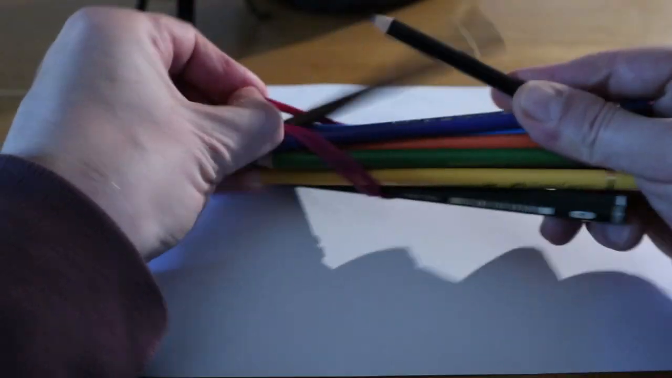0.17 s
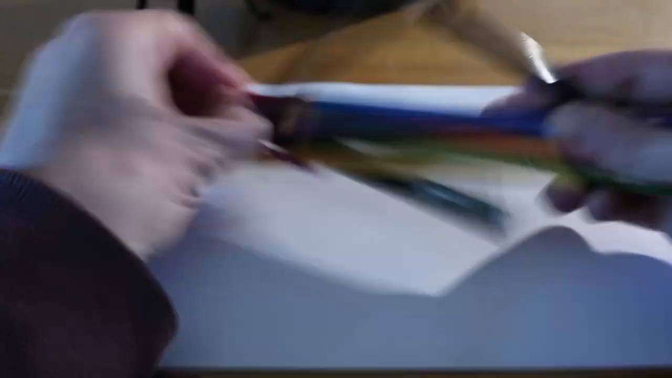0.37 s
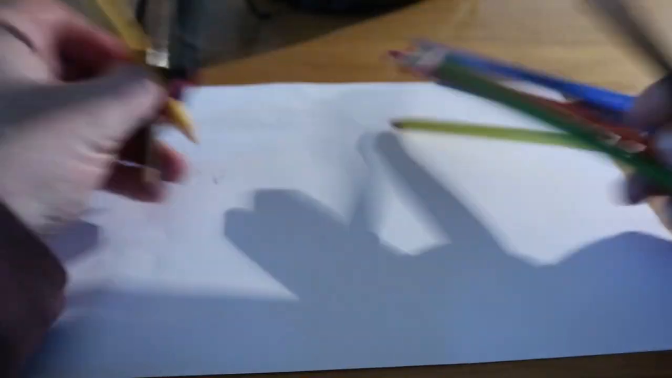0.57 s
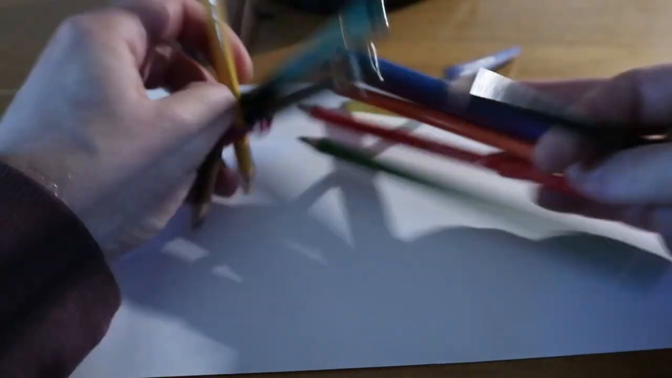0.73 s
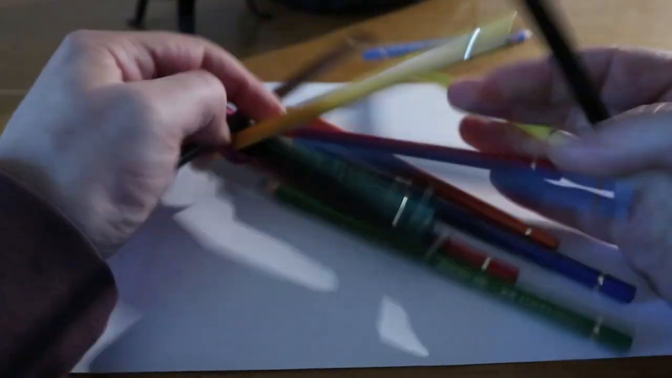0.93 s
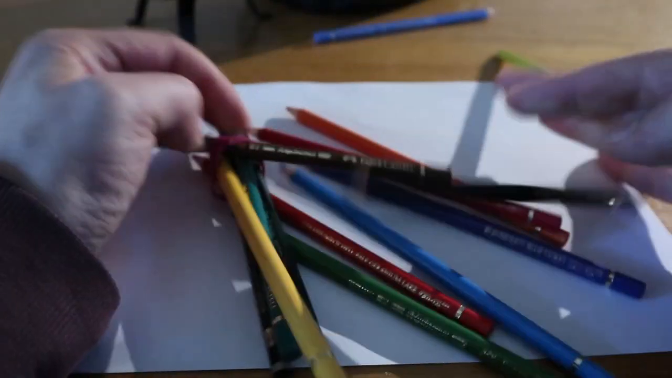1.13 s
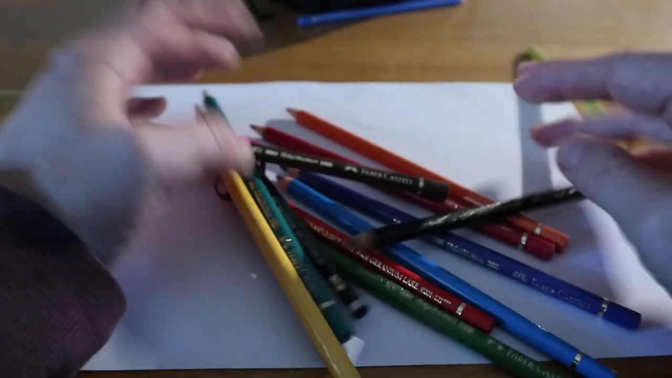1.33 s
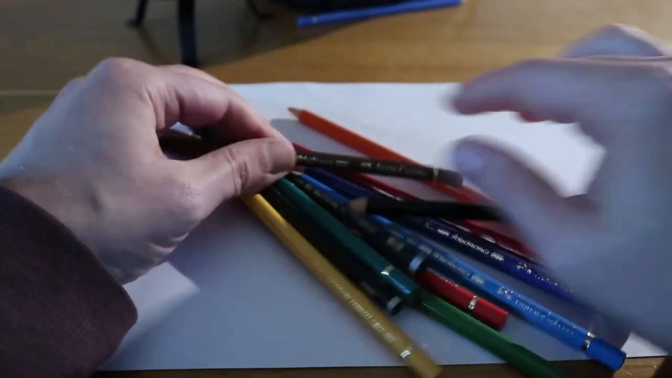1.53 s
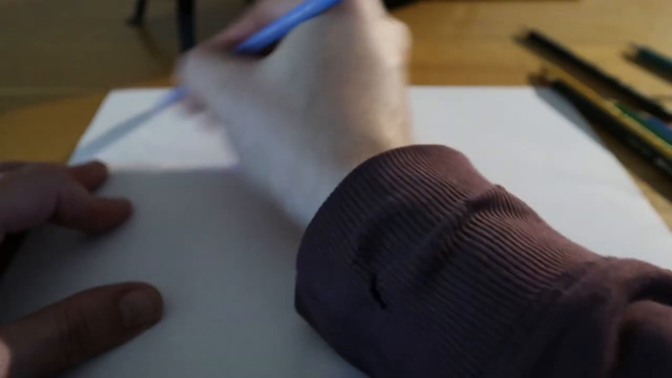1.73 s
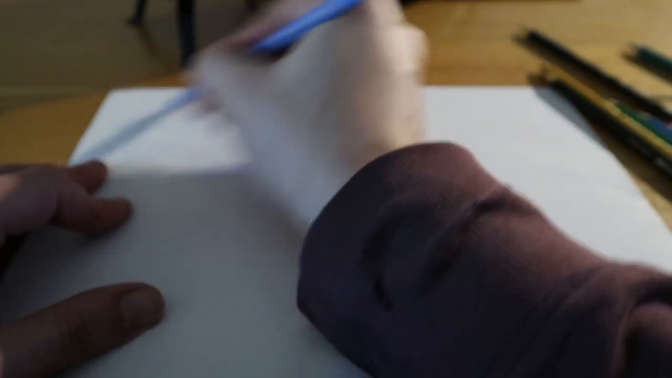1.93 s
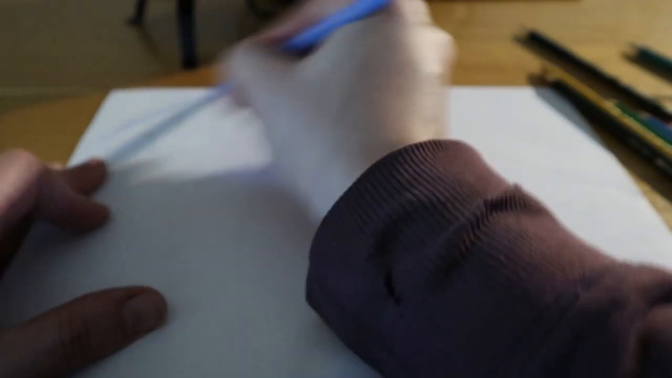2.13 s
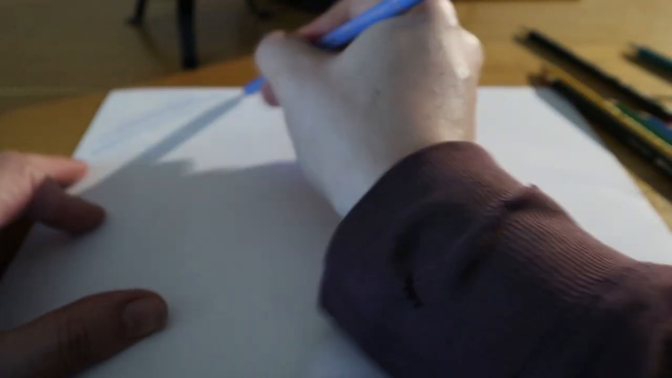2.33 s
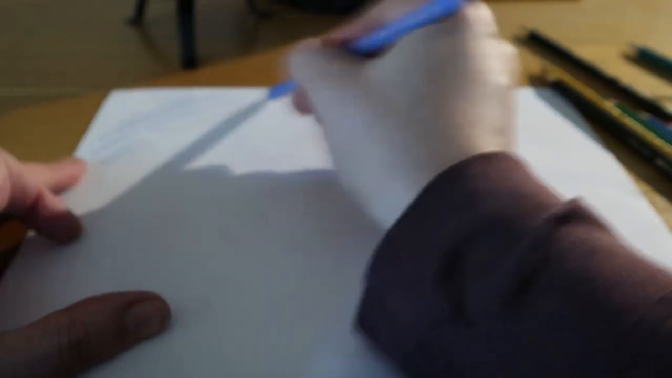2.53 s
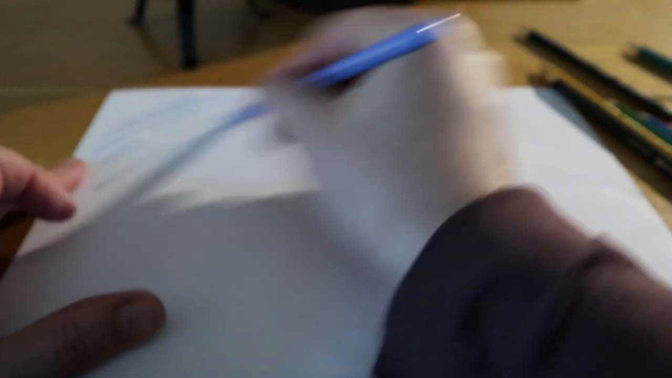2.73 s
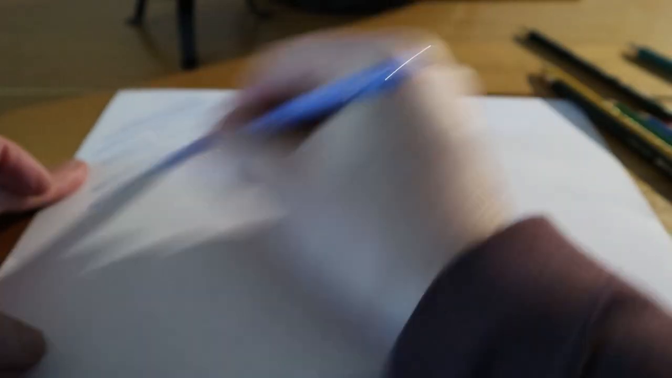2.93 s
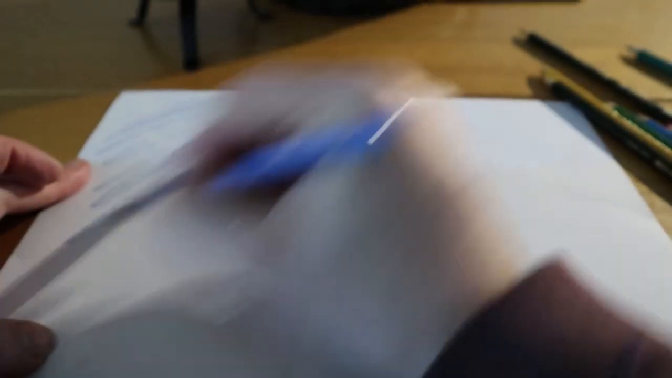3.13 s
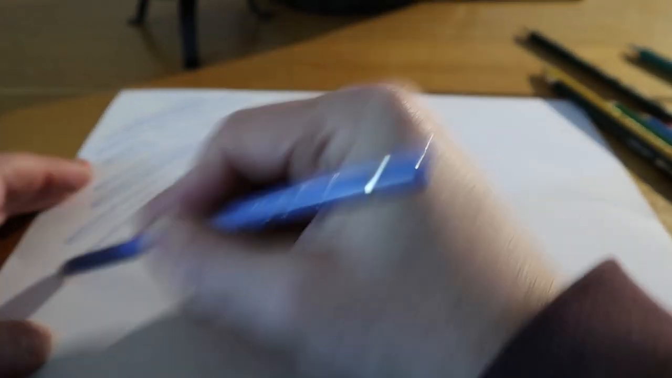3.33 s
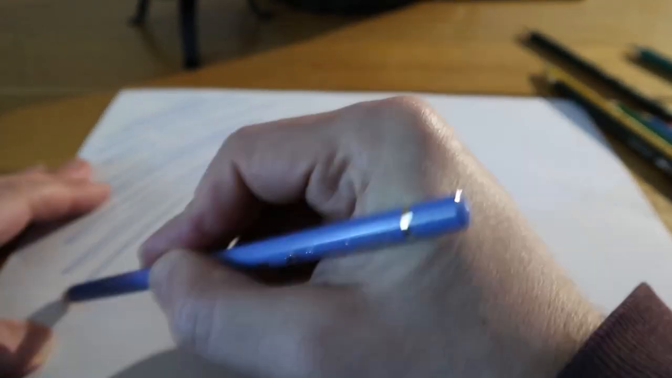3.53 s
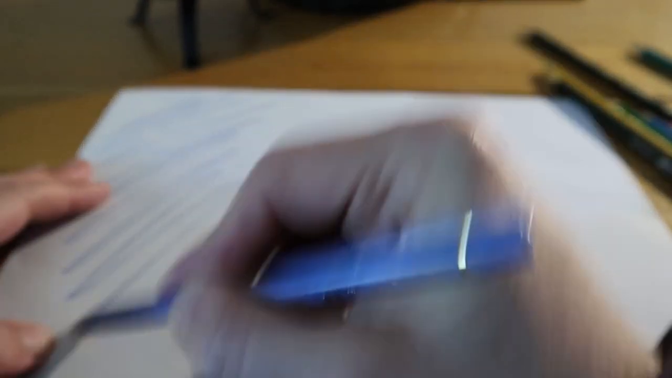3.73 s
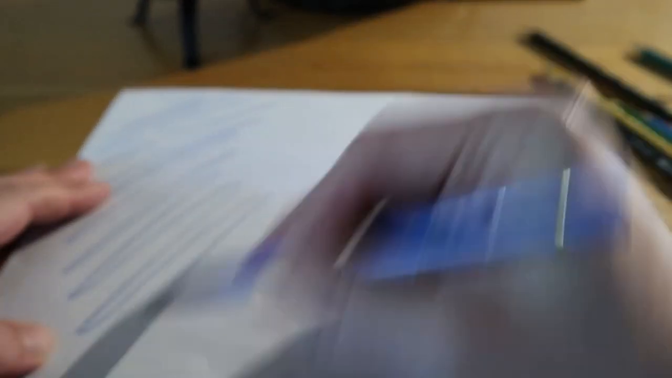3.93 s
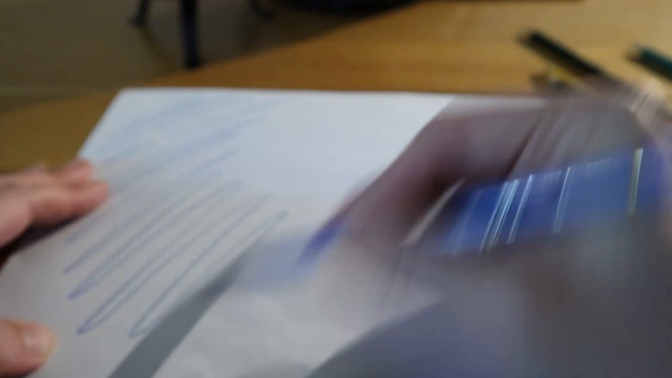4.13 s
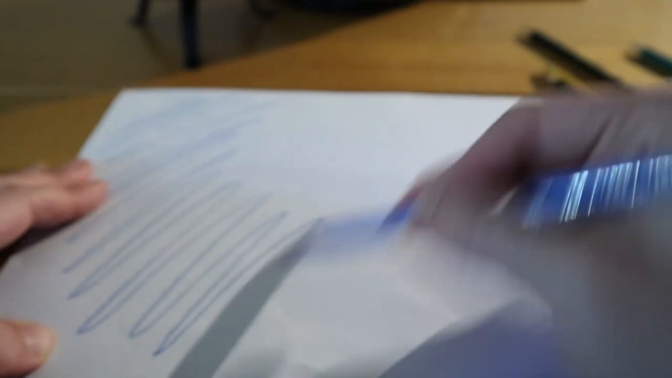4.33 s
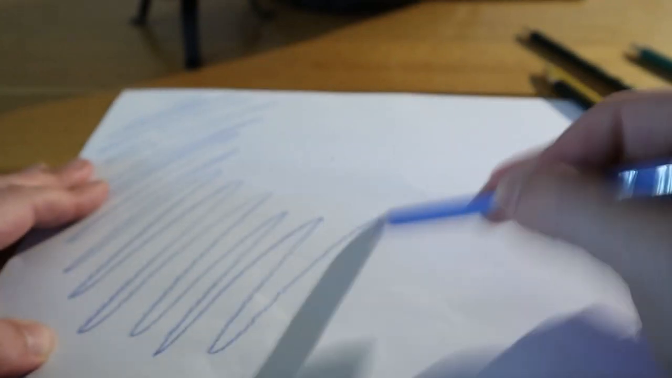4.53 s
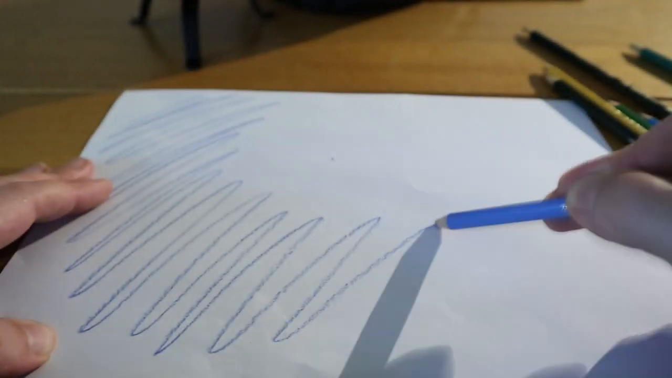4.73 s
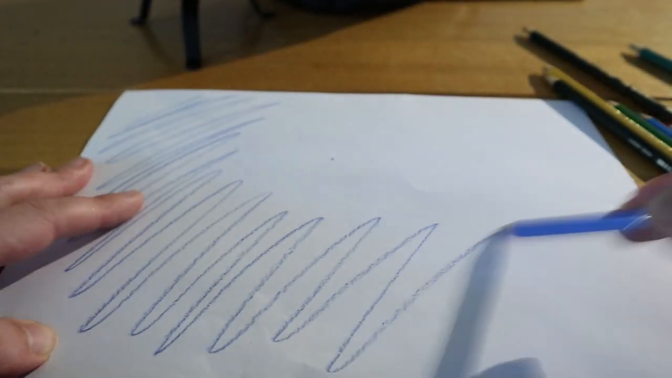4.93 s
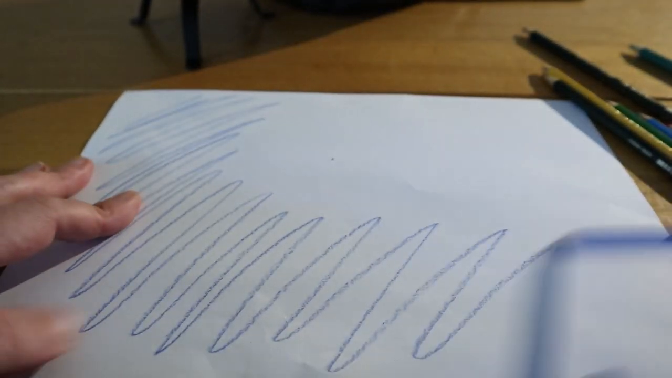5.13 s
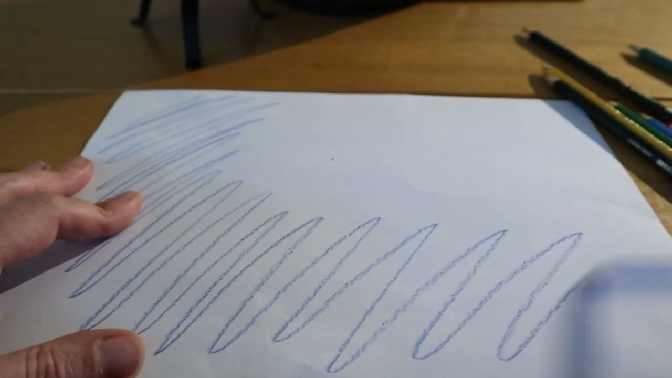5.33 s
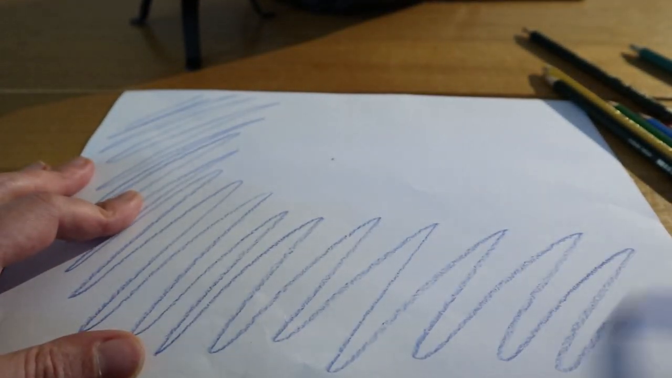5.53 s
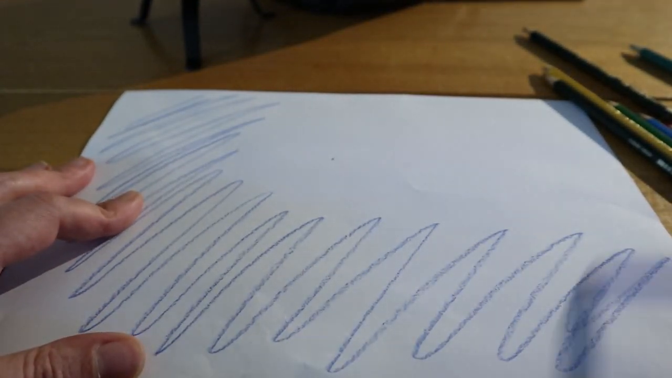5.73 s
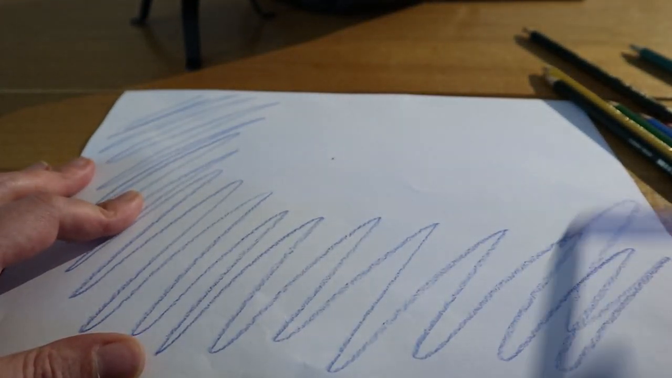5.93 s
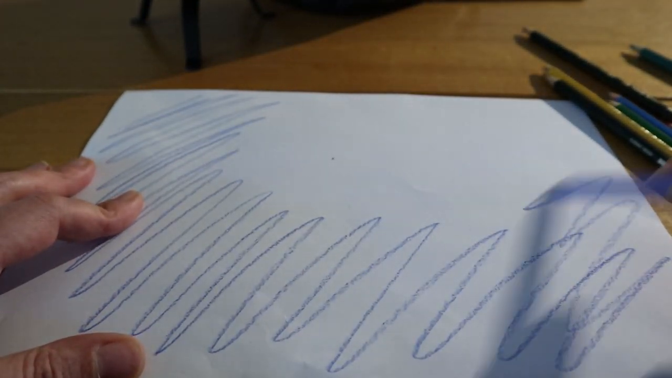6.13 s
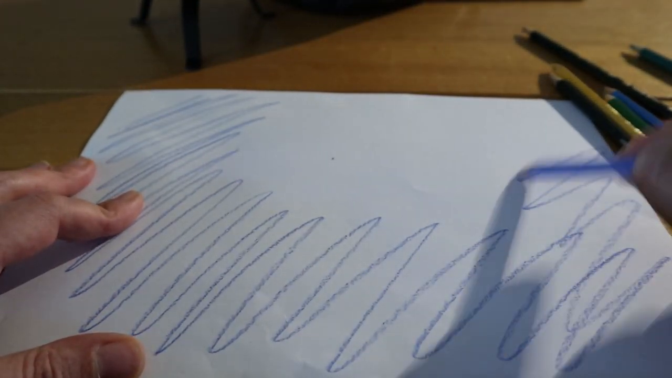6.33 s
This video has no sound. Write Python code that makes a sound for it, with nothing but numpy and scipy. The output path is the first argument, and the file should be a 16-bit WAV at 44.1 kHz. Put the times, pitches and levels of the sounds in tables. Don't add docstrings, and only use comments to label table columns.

```python
import sys
import numpy as np
from scipy import signal
from scipy.fft import rfft, irfft, next_fast_len
from scipy.io import wavfile
from scipy.ndimage import map_coordinates

SR = 44100
rng = np.random.default_rng(int(sys.argv[2]) if len(sys.argv) > 2 else 0)


def wrap_up_sound(samples):
    columns = np.atleast_2d(samples).T
    tamed = np.clip(columns, -1, 1)
    steps = np.round(tamed * 32767).astype(np.int16)
    wavfile.write(sys.argv[1], SR, steps)


def volts_from_db(level):
    exponent = np.asarray(level, float) / 20
    return 10 ** exponent


N = 286209
T = np.arange(N) / SR
SCENE_CHANGE_S = 1.606
PUT_DOWN_S, REACHED_S = 1.62, 5.98
TIP_HZ = 8000


def unit(x):
    return x / np.sqrt(np.mean(np.abs(x) ** 2) + 1e-20)


def along(points, hz):
    f, value = np.transpose(points)
    return np.interp(np.log(hz + 1), np.log(f + 1), value)


def filtered(x, response):
    m = next_fast_len(N + SR // 4)
    return irfft(rfft(x, m) * response(np.fft.rfftfreq(m, 1 / SR)), m)[..., :N]


def modes(table):
    def response(f):
        total = 0
        for k, (hz, width, db) in enumerate(table):
            total = total + (-1) ** k * volts_from_db(db) * 1j * f * width / (hz * hz - f * f + 1j * f * width)
        return total
    return response


def resonate(x, hz, width, times=1):
    for _ in range(times):
        x = signal.lfilter(*signal.iirpeak(hz, hz / width, SR), x)
    return x


def decay(t, t60):
    return volts_from_db(-60 * t / t60)


def onset(t, rise_s):
    return 1 - np.exp(-t / rise_s)


def sine(hz, t):
    return np.sin(2 * np.pi * hz * t)


def add_at(out, s, sound):
    out[..., round(s * SR):][..., :sound.shape[-1]] += sound


def wobble(rate):
    return map_coordinates(rng.standard_normal(int(N * rate / SR) + 4), [T * rate])


def grains(rate, spread_db):
    hit = rng.random(N) < rate / SR
    return unit(hit * rng.standard_normal(N) * volts_from_db(spread_db * rng.exponential(size=N)))


def placed(x, lag):
    hz, t, z = signal.stft(x, SR, nperseg=256)
    turn = np.exp(-1j * np.pi * hz[:, None] / SR * np.interp(t, T, lag))
    return signal.istft(np.array([z * turn, z / turn]), SR, nperseg=256)[1][:, :N]


# turning point t/s, hiss level/dB, barrel ring over hiss level/dB
PUSH_STROKES = [(1.635, -44.5, 2), (1.88, -41, -2.5), (2.077, -38, 0), (2.292, -37.5, 1), (2.515, -35, 3),
                (2.732, -37, -2.5), (2.959, -35.5, -5), (3.167, -31, -1.5), (3.409, -30, -15),
                (3.613, -34, -14), (3.833, -33.5, -5.5), (4.056, -34, -11.5), (4.272, -34, -5.5),
                (4.484, -34, -8), (4.698, -34, -9.5), (4.919, -31.5, -4.5), (5.131, -33, -6),
                (5.354, -33.5, -9.5), (5.566, -35, -6.5), (5.773, -35.5, -4.5), (5.983, -36.5, -6),
                (6.179, -33.5, -9), (6.394, -32, -12)]
# turning point t/s, hiss level/dB, barrel ring over hiss level/dB
PULL_STROKES = [(1.769, -43.5, 4), (1.978, -42, 6), (2.186, -38.5, -0.5), (2.407, -42, 4.5),
                (2.623, -38, -2.5), (2.846, -38, 2), (3.066, -40.5, 5), (3.286, -39, 3.5),
                (3.503, -37.5, 0.5), (3.73, -35, 3), (3.949, -37.5, -5), (4.166, -37.5, -0.5),
                (4.382, -36.5, -2.5), (4.597, -38.5, 1), (4.814, -37, 2), (5.033, -37, -5.5),
                (5.248, -36.5, -5), (5.463, -35.5, -3), (5.679, -37, -4.5), (5.897, -38.5, -4),
                (6.084, -36.5, -6.5), (6.292, -34, -13)]


def stroke_motion():
    # moment of top speed (0-1), barrel f/Hz, hiss left at the turn level/dB
    push, pull = (0.47, 1777, -37), (0.4, 1725, -54)
    strokes = sorted([(*row, *push) for row in PUSH_STROKES] + [(*row, *pull) for row in PULL_STROKES])
    start, hiss_db, ring_db, top, pitch_hz, turn_db = np.transpose(strokes)
    pitch_hz = pitch_hz + 35 * rng.standard_normal(len(start))
    turn_db = turn_db + 26.68 * (np.abs(start - 3.164) < .02)
    end = np.append(start[1:], N / SR)
    middle = start + top * (end - start)
    knots = np.ravel(np.transpose([start, middle]))
    cycle = np.interp(T, np.append(knots, end[-1]), np.arange(len(knots) + 1) / 2)
    speed = np.abs(np.sin(np.pi * cycle))
    rest = volts_from_db(np.interp(T, start, turn_db))
    swell_db = 20 * np.log10(rest + (1 - rest) * speed + 1e-4)
    hiss_db, ring_db, pitch_hz = [np.interp(T, middle, v) for v in (hiss_db, ring_db, pitch_hz)]
    return T > start[0], cycle, swell_db, hiss_db, ring_db, pitch_hz


# t/s, peak level/dB, sharp crack level/dB
PAPER_SNAGS = [(2.019, -31, -19), (2.124, -18, -31), (2.2023, -19, -22), (2.538, -14, -21),
               (2.563, -25, -28), (2.775, -16, -18.5), (3.3156, -13.5, -23), (3.337, -29, -5.5),
               (3.472, -16.5, -21), (3.687, -15.5, -14.5), (3.699, -11, -27), (3.7549, -16.5, -24),
               (3.8788, -18.5, -7), (4.5173, -14.5, -27), (4.736, -18, -29), (4.957, -1.5, -17),
               (5.714, -15.5, -27)]


def snags():
    to_barrel, to_lead = np.zeros(N), np.zeros(N)
    for s, db, crack_db in PAPER_SNAGS:
        to_barrel[round(s * SR)] = volts_from_db(db - 8.5)
        to_lead[round(s * SR)] = volts_from_db(db + crack_db + 25.5)
    return to_barrel, to_lead


# f/Hz, width/Hz, level/dB
LEAD_MODES = [(3175, 570, -1.5), (4550, 130, -5), (5013, 405, 5), (6600, 110, -12), (7500, 1330, -3),
              (9660, 2480, 3), (1390, 220, -5), (5340, 266, -3)]
FLAT_GAIN = [8, 16.5, 6, 12, 4, 1, 3.5, -8]
PULL_GAIN = [1.5, -7, -2, 2, 0, 1.5, 3, 9.5]


def lead_hiss(level, cycle, flat, snag):
    far_gain = [0, 0, 1.5, 0, 1, 0, -0.5, 1]  # dB, once the hand has moved off to the right
    far = np.interp(T, [4.9, 5.16], [0, 1])
    pulling = np.floor(cycle) % 2 * np.minimum(2.5 * (cycle % 1), 1)
    scrape = unit(grains(14000, spread_db=1.5))
    total = np.zeros(N)
    for (hz, width, db), flat_db, pull_db, far_db in zip(LEAD_MODES, FLAT_GAIN, PULL_GAIN, far_gain):
        gain_db = db + flat * flat_db + pulling * pull_db + far * far_db + 3 * wobble(14)
        total += volts_from_db(gain_db) * resonate(scrape, hz, 1.77 * width, times=2)
    return level * unit(total) + volts_from_db(8) * resonate(filtered(snag, modes(LEAD_MODES)), 4050, 2000)


# offset f/Hz, width/Hz, level/dB
BENDING_MODES = [(-30, 74, -1), (79, 70, -1.5), (-200, 200, -8)]


def barrel_ring(ring_level, pitch_hz, snag):
    phase = np.exp(2j * np.pi * np.cumsum(pitch_hz + 35 * wobble(30)) / SR)

    def ring(push, width_hz, offset_hz=0):
        pole = np.exp(np.pi * (2j * offset_hz - width_hz) / SR)
        return np.imag(phase * signal.lfilter([1], [1, -pole], push / phase))

    rub = grains(2500, spread_db=0.45)
    total = sum(volts_from_db(db + 2.6 * wobble(20)) * ring(rub, width, offset) for offset, width, db in BENDING_MODES)
    return ring_level * unit(total) + ring(resonate(snag, 1680, 1100), width_hz=61)


# f/Hz, level density/dB per Hz
PAPER_SPECTRUM = [(530, -4.5), (900, 3), (1430, -21), (1770, -35), (2630, -58), (10300, 4.5), (11800, -4),
                  (15500, -79)]


def sheet_noise(level):
    noise = rng.standard_normal((2, N))
    return volts_from_db(-9) * level * unit(filtered(noise, lambda f: volts_from_db(along(PAPER_SPECTRUM, f))))


# t/s, level/dB
TABLE_DRAG = [(1.6, -35), (1.78, -66), (1.8, -43), (3.14, -42.5), (3.18, -32), (3.27, -45.5), (3.64, -54),
              (3.67, -45), (6.01, -50.5), (6.13, -44), (6.2, -63), (6.27, -35), (6.49, -52)]
# t/s, left lag/samples, left minus right level/dB
HAND_PATH = [
    (1.6, -.1, 0),
    (2.1, -.3, 3),
    (2.9, -.3, 2.5),
    (3.4, -.3, 0),
    (4.3, .6, 0),
    (4.8, 1.4, 0),
    (5.3, 2, -1.3),
    (6.5, 2, -1.3),
]


def scribble():
    drawing, cycle, swell_db, hiss_db, ring_db, pitch_hz = stroke_motion()
    level = drawing * volts_from_db(hiss_db + swell_db + .2 + .9 * wobble(50))
    flat = np.interp(T, [2.6, 5.3], [1, 0])
    to_barrel, to_lead = snags()
    hiss = lead_hiss(level, cycle, flat, to_lead)
    ring_level = level * volts_from_db(ring_db + 0.51 * swell_db + 1.26 * wobble(45))
    barrel = barrel_ring(ring_level, pitch_hz - 33 * flat, to_barrel)
    shake = drawing * volts_from_db(np.interp(T, *np.transpose(TABLE_DRAG)) + 1.65 * swell_db + 3.0 * wobble(25))
    table = shake * unit(table_top(rng.standard_normal(N)))
    s, lag, pan_db = np.transpose(HAND_PATH)
    lean = volts_from_db(np.interp(T, s, pan_db) * [[.5], [-.5]])
    return lean * (placed(hiss + barrel, np.interp(T, s, lag)) + sheet_noise(level)), table


# f/Hz, width/Hz
BARREL_MODES = [(1360, 40), (1750, 300), (2100, 56), (2470, 30), (3000, 30), (3750, 18), (4050, 48),
                (4600, 16), (5700, 99), (6500, 22), (7320, 310), (8500, 1600), (9450, 200), (10400, 610)]
# t/s, peak level/dB, strongest mode f/Hz, table knock level/dB, sharp crack level/dB
BUNDLE_BLOWS = [(.0014, -23.5, 3830, -7, -2), (0.064, -37.5, 2500, 1.5, -11),
                (0.0967, -17.5, 3570, -28, -36), (0.226, -21, 5440, -9.5, -33),
                (0.2602, -26, 2450, -5, -20), (.3185, -32, 1760, -6, -15), (0.4174, -11, 4160, -32, -15),
                (0.4289, -3, 2560, -37, 4), (0.4445, 2.5, 6600, -30, 6.5), (0.4527, -18, 5800, -38, -17),
                (0.4627, -7, 5100, -9, -20), (.475, -16, 7940, -30, 14), (0.4856, -24.5, 9250, -38, 28),
                (0.5286, -23.5, 7060, -34, 17), (0.5569, -19, 4730, -14, -28), (0.582, -32.5, 2840, 8, -33),
                (0.6383, -10.5, 1970, -11, -35), (0.6622, -14, 4450, -32, -22), (0.7378, -20, 1620, 0, 9),
                (0.7531, -13.5, 4550, -19, -19), (0.7978, -14.5, 4660, -19, -26)]
# t/s, peak level/dB, strongest mode f/Hz, table knock level/dB, sharp crack level/dB
TUMBLE_BLOWS = [(0.8252, -14.5, 4140, -6.5, -18), (0.837, -16, 4770, -0.5, -25),
                (.852, -12.5, 4550, -29, -27), (0.864, -13, 7240, -9, -27), (0.887, -19, 4590, -5, -4),
                (0.8923, -17, 2900, -1.5, -21), (0.9128, -14, 4440, -8, -15), (0.9252, -16.5, 4100, -21, 5),
                (0.9657, -21.5, 1810, 2.5, 10), (0.998, -19, 1990, 2, -6), (1.042, -17, 4040, -14, -6),
                (1.058, -11, 4640, -2, 1), (1.0937, -20.5, 6600, -1, -16), (1.1168, -14, 4600, -16, -22),
                (1.1504, -16, 7160, -15, -23), (1.1894, -6.5, 3060, -3.5, 9), (1.227, -21, 3920, -15, -22),
                (1.25, -16.5, 3700, -6, -12), (1.2644, -13.5, 1530, -8, 2.5),
                (1.3115, -26.5, 2150, 7, 18.5)]
# t/s, peak level/dB, strongest mode f/Hz, table knock level/dB, crack level/dB
NUDGE_BLOWS = [(1.387, -23, 2840, -1, -15), (1.4279, -13, 4550, -29, 3.5), (1.435, -12.5, 7130, -28, -18),
               (1.453, -12.5, 3920, -23, 3), (1.4667, -14, 6100, -4, -22), (1.478, -7, 2520, -6, -2),
               (1.487, -29, 2160, -1, -16), (1.5236, -17.5, 4400, -24, -30), (1.534, -18.5, 1730, -5, -22),
               (1.5642, -4, 9230, -11, -26), (1.605, -29.5, 4900, -20, 9), (6.078, -20.5, 4530, -17, -30),
               (6.11, -24.5, 1500, -0.5, -25), (6.156, -24.5, 5800, -10, -16), (6.256, -22, 4020, -12, -19),
               (6.27, -23, 4600, -12, -19), (6.327, -18.5, 2400, -8, 6), (6.3451, -23, 2050, -10, -4)]


def clacks():
    out, knock, t = np.zeros((2, N + SR)), np.zeros(N), np.arange(SR // 16) / SR
    hz, width = np.transpose(BARREL_MODES)[..., None]
    # t60/s at 4500 Hz, growth with pitch
    held, dropped, lying = (0.0084, -0.073), (0.027, 0.51), (0.026, 0.28)
    blows = [(*row, *held) for row in BUNDLE_BLOWS]
    blows += [(*row, *dropped) for row in TUMBLE_BLOWS]
    blows += [(*row, *lying) for row in NUDGE_BLOWS]
    for s, db, main_hz, knock_db, crack_db, ring_s, growth in blows:
        t60 = ring_s * (main_hz / 4500) ** growth * (0.41 if main_hz > TIP_HZ else 1)
        main = volts_from_db(-5.5) * decay(t, np.clip(t60, .004, .06)) * sine(main_hz, t)
        length, chance = rng.normal(size=(2, len(hz), 1))
        others = volts_from_db(-20.5 + 7.1 * chance - 5.5 * np.abs(np.log2(hz / main_hz)))
        others = others * np.exp(-np.pi * np.maximum(3.5 * width, 110) * t)
        others = others * sine(hz * (1 + 0.032 * length), t)
        ring = (main + others.sum(0)) * onset(t, 0.00031)
        noise = rng.standard_normal((2, len(t))) * (decay(t, 0.0044) + volts_from_db(-24.5) * decay(t, 0.036))
        noise = noise * onset(t, 0.00042)
        wood = rng.standard_normal((2, len(t))) * decay(t, 0.056)
        crack = volts_from_db(5.5) * resonate(resonate(noise, main_hz, 1.24 * main_hz), main_hz, 1.3 * main_hz)
        crack += volts_from_db(knock_db + 3.5) * resonate(wood, 1780, 1930)
        crack += volts_from_db(crack_db + 3.5) * resonate(resonate(noise, 6200, 8100), 6100, 8600)
        add_at(out, s, volts_from_db(db) * (ring + crack[0] + 0.32 * crack[1] * [[1], [-1]]))
        knock[round(s * SR)] = volts_from_db(db + knock_db + 25.0)
    return out[:, :N], table_top(knock)


# t/s, peak level/dB, f/Hz, t60/s
LONE_RINGS = [(.058, -48, 2490, 0.15), (.260, -29, 2430, 0.056), (.429, -7, 9200, 0.011),
              (.453, -10, 9400, 0.011), (0.528, -26, 9400, 0.011), (.662, -20, 10500, 0.018),
              (.668, -33, 4500, 0.05), (.754, -29, 10500, 0.013), (.755, -32, 4560, .08),
              (.8, -29, 4600, .06), (.83, -28, 4580, .06), (.799, -32, 6500, .02),
              (.852, -15.5, 6460, 0.02), (.887, -23, 7400, .03), (.911, -26, 10100, 0.02),
              (.926, -27, 4020, 0.039), (.927, -22, 9400, .02), (.961, -21, 5900, .02),
              (.967, -20.5, 6540, 0.022), (.998, -20, 8600, 0.022), (.999, -30, 11600, .015),
              (1.0, -25, 4270, 0.053), (1.048, -19, 9300, .02), (1.057, -2, 10340, 0.013),
              (1.058, -16, 7300, 0.023), (1.184, -19, 10500, 0.019), (1.19, -15, 6470, 0.022),
              (1.191, -16, 5070, 0.022), (1.228, -24, 5660, .03), (1.265, -21, 8900, 0.022),
              (1.311, -16, 8670, 0.019), (1.312, -23, 3640, 0.026), (1.565, -16, 6410, 0.019),
              (1.566, -17, 4360, 0.016), (1.566, -19.5, 3470, 0.02), (1.576, -24, 9400, .03),
              (1.578, -28, 12500, .02), (1.565, -14, 12500, .02), (1.454, -19, 6500, .015),
              (1.462, -20, 7400, 0.011), (1.478, -18, 10800, 0.013), (1.505, -26, 4620, 0.018),
              (1.436, -24, 11100, .015), (1.339, -37, 5800, .04), (1.339, -33, 3960, 0.022),
              (6.078, -33, 7400, .015), (6.257, -23, 6700, .015), (6.327, -23.5, 5960, 0.022),
              (6.327, -26, 8300, 0.017), (6.447, -32, 6060, 0.028)]


def chimes():
    out, t = np.zeros((2, N + SR)), np.arange(SR // 10) / SR
    for (s, db, hz, t60), side in zip(LONE_RINGS, rng.normal(size=len(LONE_RINGS))):
        t60 = t60 * (.6 if hz > TIP_HZ else 1)
        ring = volts_from_db(db) * decay(t, t60) * onset(t, 0.00018) * sine(hz, t)
        add_at(out, s, volts_from_db(2.0 * side * np.array([[1], [-1]])) * ring)
    return out[:, :N]


# t/s, peak level/dB, f/Hz
LACQUER_TICKS = [(0.0978, -27, 4200), (.188, -35, 2200), (.2262, -16, 5900), (0.415, -23, 2800),
                 (.426, -6, 4200), (0.44, -12, 5000), (.4292, -2, 9500), (0.4535, 0, 8000),
                 (0.466, -5, 5500), (.485, 3, 9360), (0.4972, -11, 6500), (0.5277, -20, 7000),
                 (1.1504, -16, 7200), (.9135, -9.5, 1800), (1.1169, -14, 2100), (1.2075, -17, 3000),
                 (6.156, -26, 6800), (6.258, -28, 4500), (6.327, -23, 3500)]


def ticks():
    out, t = np.zeros(N + SR), np.arange(SR // 6) / SR
    for s, db, hz in LACQUER_TICKS:
        add_at(out, s, volts_from_db(db) * decay(t, 0.0028) * (sine(hz, t) + 0.26 * rng.standard_normal(len(t))))
    return out[:N]


def swells(start, hold, db, out_db_per_s):
    rise_db = 800 * np.maximum(start - T, 0)
    return volts_from_db(db - rise_db - out_db_per_s * np.maximum(T - start - hold, 0))


def contact_bursts():
    return unit(signal.lfilter([1], [1, -np.exp(-1 / (.0025 * SR))], np.abs(grains(260, spread_db=1.2))))


# f/Hz, level density/dB per Hz
RATTLE_SPECTRUM = [(530, -33), (900, -30), (1380, 9.5), (1910, -9), (4550, -4), (7960, -32), (10500, -7),
                   (13900, -73), (15500, -44)]
# full from t/s, hold t/s, rattle level/dB, rumble over rattle level/dB
SLIDE_EVENTS = [(.001, 0.0018, -48.5, -13), (0.07, 0.062, -55, 7), (0.233, 0.051, -37.5, -9),
                (.3, 0.1, -44.5, -7.5), (0.395, .012, -36, -0.5), (0.409, 0.022, -31.5, -14),
                (0.425, 0.018, -22, -14.5), (0.556, 0.01, -36.5, -3.5), (0.667, 0.0069, -32.5, -2.5),
                (0.752, 0.013, -32.5, -6), (0.83, 0.2, -27.5, -3.5), (1.041, 0.027, -25.5, 0),
                (1.086, 0.046, -27.5, -4.5), (1.155, .1, -28, -6), (1.19, 0.011, -20, -6),
                (1.246, 0.083, -32.5, 2), (1.429, 0.039, -31.5, -0.5), (1.478, 0.013, -26.5, 2.5),
                (1.558, 0.041, -30.5, -5.5), (6.042, .04, -56, 10), (6.094, 0.06, -44.5, 5),
                (6.194, 0.036, -57, 7), (6.263, 0.0058, -37, 0.5), (6.339, 0.044, -44, 5),
                (6.402, 0.1, -48.5, 5)]


def rolling():
    start, hold, db, weight_db = np.transpose(SLIDE_EVENTS)[..., None]
    sliding = swells(start, hold, db, 282)
    on_table_db = (weight_db * sliding).sum(0) / (sliding.sum(0) + 1e-30)
    moving = (T < PUT_DOWN_S) | (T > REACHED_S)
    rings = np.zeros(N)
    for hz, width in BARREL_MODES:
        ring = unit(resonate(grains(110, spread_db=2.0), hz, 2.0 * width))
        rings += volts_from_db(along(RATTLE_SPECTRUM, hz)) * np.sqrt(width) * ring
    shared = .5 + .6 * contact_bursts()
    bursts = np.array([shared + .7 * contact_bursts() for band in range(3)])
    mid, side = rng.standard_normal((2, 3, 1, N))
    woody, plain, sharp = bursts[:, None] * (mid + .8 * side * [[1], [-1]])
    scuffs = volts_from_db(2.0) * unit(resonate(plain, 2650, 2900, times=2))
    scuffs += volts_from_db(1.5 + 2.22 * on_table_db) * unit(resonate(woody, 1080, 1170, times=2))
    scuffs += volts_from_db(-12 - 1.48 * on_table_db) * unit(resonate(sharp, 5600, 5600))
    rattle = moving * sliding.max(0) * volts_from_db(-8.0) * (volts_from_db(-1.5) * unit(rings) + scuffs)
    weight = swells(start, hold, db + weight_db - 0.5, 227).max(0)
    rumble = moving * weight * unit(table_top(grains(900, spread_db=1.2)))
    return rattle, rumble


# t/s, left lag/samples
HEAP_PATH = [
    (0, .8),
    (.5, .8),
    (.6, 1.3),
    (.8, 1.3),
    (.9, .95),
    (1.35, .95),
    (1.42, 1.3),
    (6.5, 1.8),
]


def heap(pair):
    side = filtered((pair[0] - pair[1]) / 2, lambda hz: hz ** 2 / (hz ** 2 + 2200 ** 2))
    heard = placed(pair.mean(0), np.interp(T, *np.transpose(HEAP_PATH))) + side * [[1], [-1]]
    return filtered(heard, lambda hz: volts_from_db(1.2 * hz / 20000 * np.array([[-1], [1]])))


# f/Hz, width/Hz, level/dB
TABLE_MODES = [(149, 64, -0.5), (257.7, 43.4, 6.5), (371.7, 37, 8), (659.6, 63, 2), (751.5, 44, 4.5),
               (1090, 440, -7)]


def table_top(push):
    return filtered(push, modes(TABLE_MODES))


# t/s, peak level/dB, f/Hz
HOLLOW_KNOCKS = [(.836, -42, 715), (.896, -24.5, 598), (.969, -23, 664), (1.004, -28, 660),
                 (1.058, -14.5, 717), (1.068, -24, 693), (1.1, -24, 703), (1.118, -23, 723),
                 (1.157, -18.5, 715), (1.17, -31, 720), (1.189, -14, 740), (1.203, -15.5, 712),
                 (1.265, -22, 676), (1.28, -22, 717), (1.312, -27, 724), (1.33, -20, 732),
                 (1.436, -33, 740), (1.476, -28, 755), (1.488, -19, 1100), (0.558, -36.5, 278),
                 (.74, -32, 266), (0.829, -26.5, 289), (0.851, -27, 258), (1.01, -29, 288),
                 (1.112, -26, 297), (3.229, -33, 340), (3.248, -38, 400), (6.236, -34, 368),
                 (6.257, -28, 377), (6.288, -34.5, 380), (6.313, -33, 367), (6.35, -38, 371),
                 (6.399, -38, 300), (6.419, -45, 298)]


def hollow_knocks():
    out, t = np.zeros(N + SR), np.arange(SR // 6) / SR
    for s, db, hz in HOLLOW_KNOCKS:
        add_at(out, s, volts_from_db(db) * decay(t, 34 / hz) * onset(t, .0012) * sine(hz, t))
    return out[:N]


# t/s, level/dB, f/Hz
WRIST_THUDS = [
    (3.1696, -16, 400),
    (3.1739, -19, 403),
    (3.1795, -9, 397),
    (3.1899, -15, 298),
    (3.196, -25, 300),
    (3.208, -35, 450),
    (3.214, -40, 520),
    (3.23, -34, 330),
    (3.252, -28, 200),
]


def wrist():
    out, t = np.zeros(N), np.arange(SR // 20) / SR
    for s, db, hz in WRIST_THUDS:
        add_at(out, s, -volts_from_db(db + 7) * decay(t, 0.0086) * onset(t, 0.00058) * sine(hz, t))
    return out


# t/s, level/dB, f/Hz
SOFT_BUMPS = [
    (0.071, -31, 250),
    (0.124, -29, 163),
    (0.137, -37, 220),
    (.69, -33, 35),
    (4.9, -34, 30),
    (3.17, -25, 35),
]


def bumps():
    out, t = np.zeros(N + SR), np.arange(SR // 4) / SR
    for s, db, hz in SOFT_BUMPS:
        add_at(out, s, volts_from_db(db) * decay(t, 4.4 / hz) * onset(t, 1 / (6 * hz)) * sine(hz, t))
    return out[:N]


# f/Hz, t60/s
ROOM_DECAY = [(200, 0.35), (2000, 0.069), (10000, 0.018)]


def room(x):
    hz, t, z = signal.stft(rng.standard_normal((2, SR // 2)), SR, nperseg=256)
    z = z * [np.ones(len(hz))[:, None], np.clip(hz[:, None] / 2200, 0, 1)]
    mid, side = signal.istft(z * decay(t, along(ROOM_DECAY, hz)[:, None]), SR, nperseg=256)[1]
    tail = np.array([mid + side, mid - side])
    return signal.fftconvolve(np.pad(x, (200, 0))[None], tail / np.linalg.norm(tail[0]), axes=1)[:, :N]


# f/Hz, level density/dB per Hz
AIR_SPECTRUM = [(20, -7), (45, -5), (70, -16), (85, 0), (100, 4.5), (120, -0.5), (135, -6.5), (350, -3),
                (1040, -14), (2300, -16.5), (9000, -28), (12500, -19), (15500, -32)]
# f/Hz, correlation (0-1)
AIR_COHERENCE = [(60, .995), (130, .95), (290, .75), (640, .55), (2000, .2), (10000, .05)]
# f/Hz, level/dB
FIRST_SCENE_AIR = [(200, 0.5), (500, -4), (2000, -0.5), (8000, 2.5), (13000, -10)]


def air():
    def mid_and_side(hz):
        turn = np.arccos(np.clip(along(AIR_COHERENCE, hz), -1, 1)) / 2
        return volts_from_db(along(AIR_SPECTRUM, hz)) * [np.cos(turn), np.sin(turn)]

    mid, side = filtered(rng.standard_normal((2, N)), mid_and_side)
    pair = unit(np.array([mid + side, mid - side]))
    quieter = filtered(pair, lambda hz: volts_from_db(along(FIRST_SCENE_AIR, hz)))
    pair = np.where(T < SCENE_CHANGE_S, quieter, pair)
    return volts_from_db(-44.5 + 1.1 * wobble(4.01)) * pair


def scene():
    lead, shake = scribble()
    blows, knock = clacks()
    rattle, rumble = rolling()
    table = shake + knock + rumble + wrist() + bumps() + hollow_knocks()
    before = T < SCENE_CHANGE_S
    loose = (before | (T > REACHED_S)) * heap(blows + rattle + chimes() + ticks())
    source = volts_from_db(-8) * lead.mean(0) + volts_from_db(-10.5) * loose.mean(0) + volts_from_db(-12.5) * table
    echo = before * room(before * source) + room(~before * source)
    return volts_from_db(-2.0) * lead + loose + table + echo + air()


def band_limit(x):
    return signal.sosfilt(signal.butter(12, 15670, fs=SR, output="sos"), x)


def record(dry):
    rolloff = [(11000, -2.0), (13000, -8.0), (15500, -20), (15900, -60)]  # f/Hz, level/dB
    mix = np.clip(filtered(dry, lambda hz: volts_from_db(along(rolloff, hz))), -.85, .85)
    return band_limit(mix)


dry = scene()
out = record(dry)
wrap_up_sound(out)
```